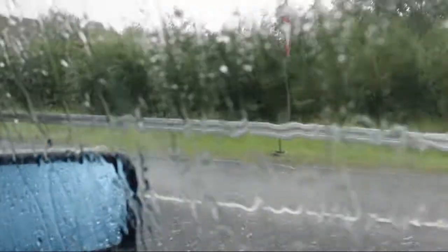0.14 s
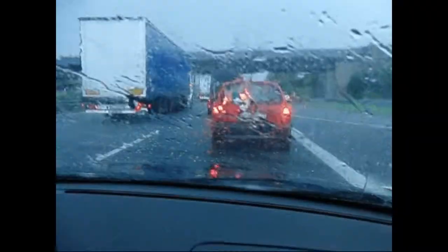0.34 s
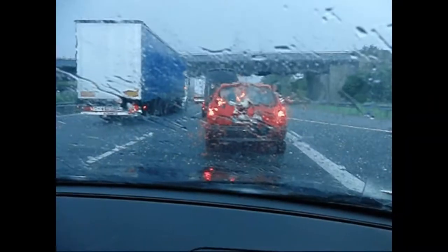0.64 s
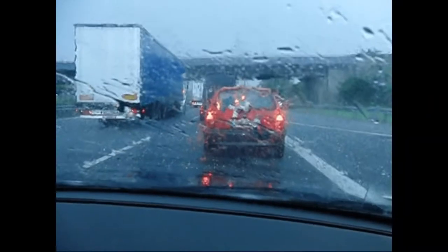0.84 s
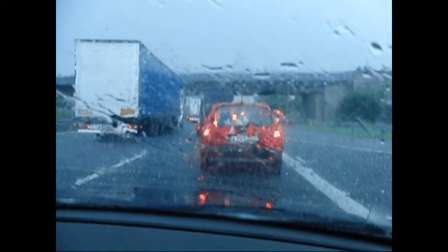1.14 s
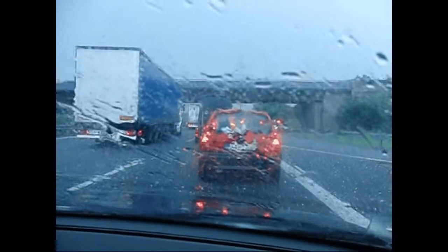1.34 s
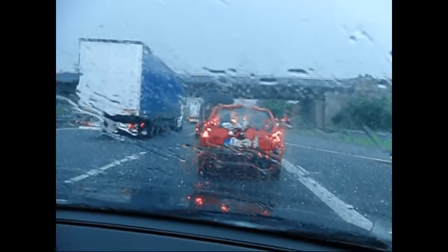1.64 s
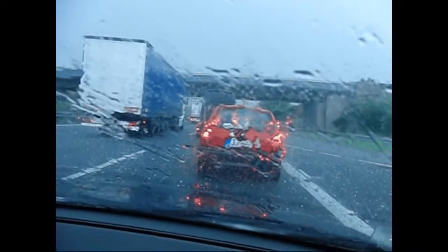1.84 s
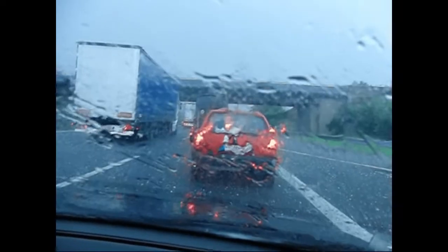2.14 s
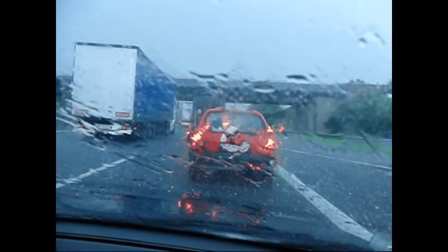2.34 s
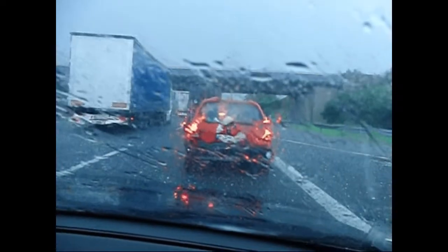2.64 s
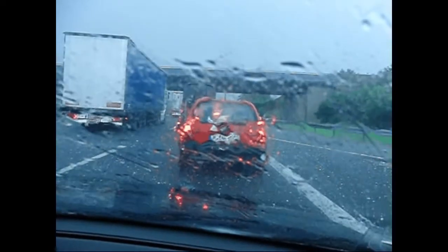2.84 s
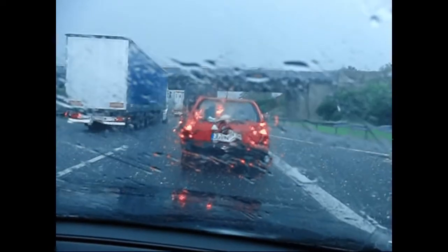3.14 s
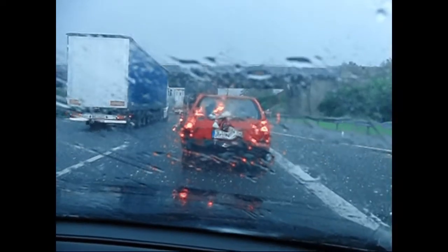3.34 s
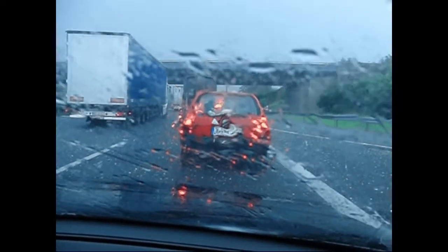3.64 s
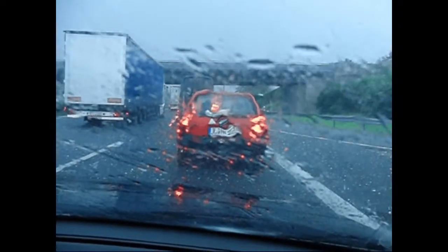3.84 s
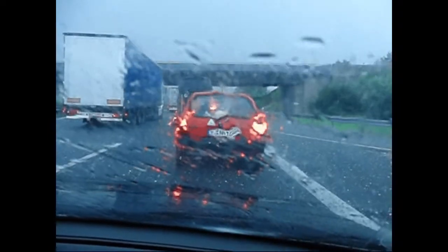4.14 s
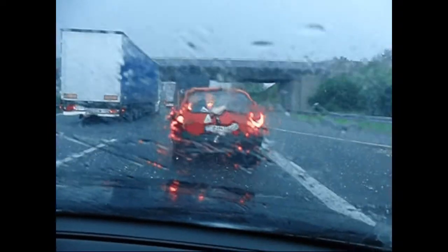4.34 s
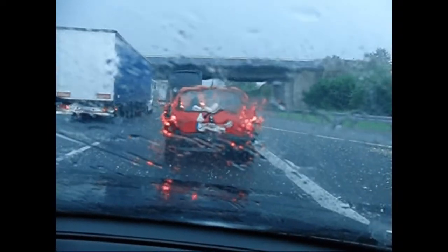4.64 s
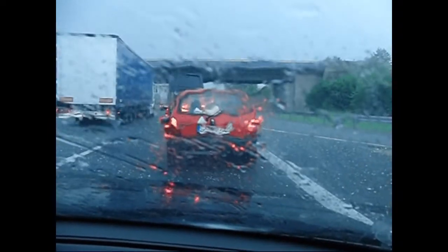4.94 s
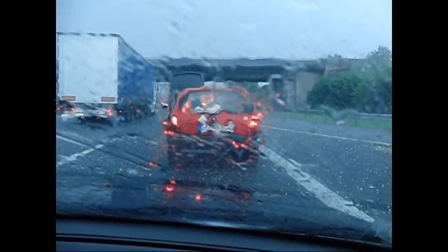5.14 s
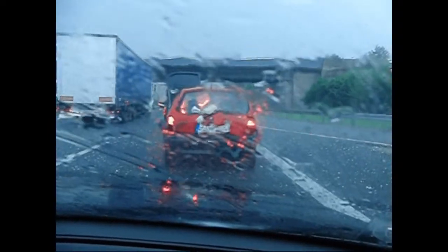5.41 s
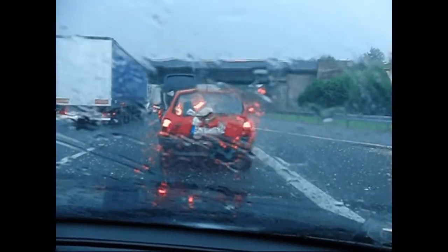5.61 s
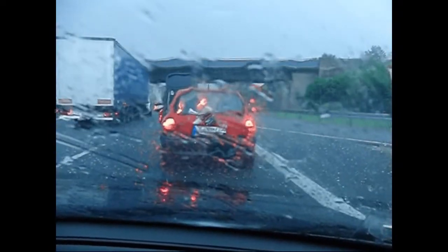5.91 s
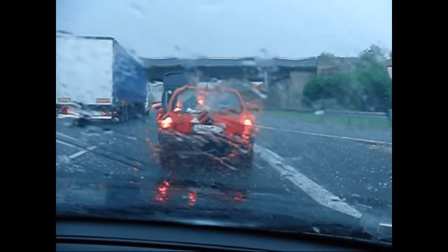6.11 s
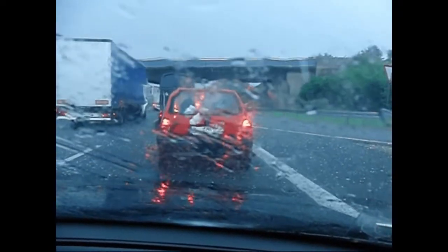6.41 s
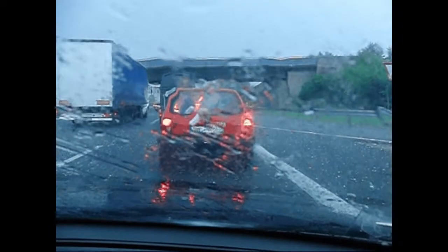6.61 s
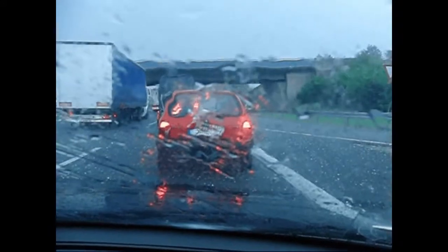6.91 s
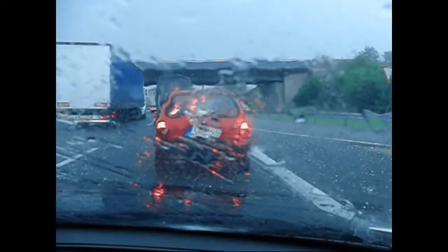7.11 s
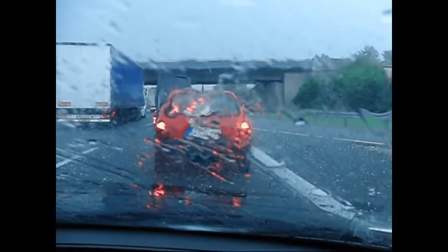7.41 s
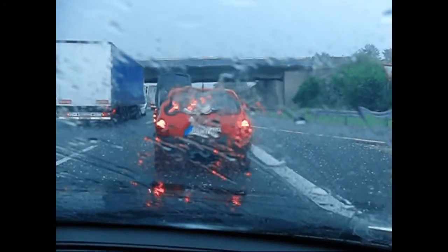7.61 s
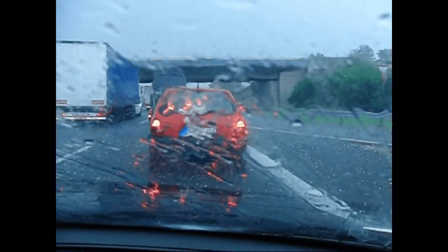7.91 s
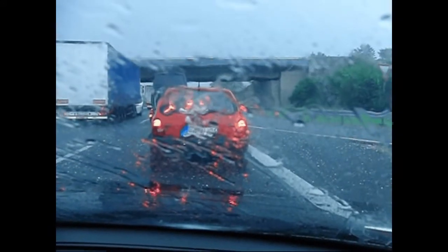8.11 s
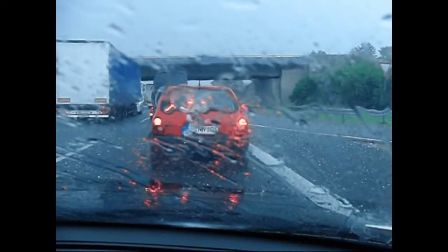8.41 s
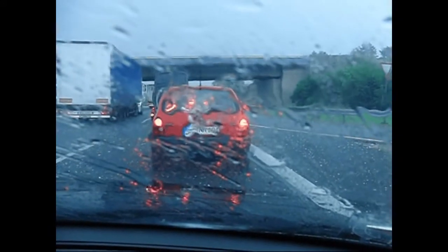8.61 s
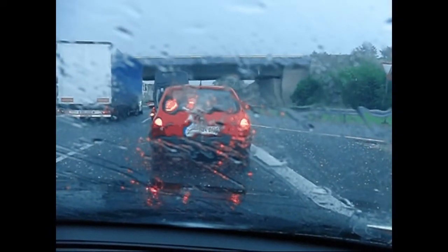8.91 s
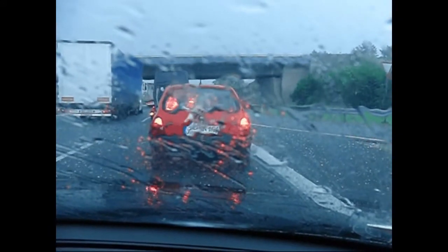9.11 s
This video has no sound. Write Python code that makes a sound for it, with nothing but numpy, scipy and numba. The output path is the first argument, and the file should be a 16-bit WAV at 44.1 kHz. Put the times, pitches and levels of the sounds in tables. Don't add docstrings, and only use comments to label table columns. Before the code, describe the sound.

For a third of a second, bright dense rain hisses at a car's side window. A hard cut leads into the dull cabin, where small hail patters steadily and big stones knock on roof and windscreen at irregular moments, the loudest near 1.65, 3.6, 6.65 and 8.8 seconds. Low tyre and engine rumble lies beneath. A small camera microphone limits the peaks.

```python
import sys
import numpy as np
from scipy import signal
from scipy.fft import rfft, irfft, next_fast_len
from scipy.io import wavfile
from scipy.ndimage import uniform_filter1d, minimum_filter1d
from numba import njit

SR = 44100
rng = np.random.default_rng(int(sys.argv[2]) if len(sys.argv) > 2 else 0)


def transcribe(signal):
    frames = np.atleast_2d(signal).T
    limited = np.clip(frames, -1, 1)
    pcm = np.round(limited * 32767).astype(np.int16)
    wavfile.write(sys.argv[1], SR, pcm)


def field_ratio(decibels):
    return 10 ** (np.asarray(decibels, dtype=float) / 20)


N = 408366

# (time [s], peak level [dB], knock centre [Hz], crack re knock [dB], build-up [ms])
HEAVY_STONES = [(0.368, -9, 990, -16, 16.2), (0.556, -26.5, 780, -5.5, 4), (0.631, -24, 1200, -1.5, 9.4),
                (1.161, -26, 1105, -4.5, 11.7), (1.472, -29.5, 846, -6.5, 12), (1.6525, -4.5, 897, -9.5, 3),
                (1.764, -13, 630, -27, 10.9), (2.189, -26.5, 770, -10, 15.3), (2.845, -19.5, 850, -8, 17.8),
                (2.874, -18, 790, -17, 1.8), (3.051, -13, 1140, -7, 24.7), (3.34, -23, 1150, -2.5, 19.5),
                (3.6045, -2.5, 860, -15, 3.17), (3.793, -23.5, 1180, -5, 12.8),
                (4.015, -17.5, 1066, -4, 13.7), (4.267, -27, 604, -16.5, 11.9), (4.582, -23, 860, -14, 3.2),
                (6.585, -31.5, 880, -9, 19), (6.644, -6, 710, -27, 14.9), (7.089, -26.5, 720, -24, 7.8),
                (8.008, -24.5, 740, -12, 20), (8.266, -21, 914, -6.5, 12.9), (8.423, -14, 1140, -9.5, 26.7),
                (8.799, -0.5, 885, -8.5, 8.15)]
# (time [s], peak level [dB], crack re knock [dB], build-up [ms])
MIDDLING_STONES = [(0.466, -27, -21, 1.3), (1.318, -32.5, -20, 11.5), (1.436, -28, -20, 2.9),
                   (1.54, -28, -24, 3.8), (1.8, -22, -17, 1.9), (1.913, -32, -17.5, 4.8),
                   (1.967, -32, -23, 13.6), (2.215, -30.5, -15, 2.1), (2.334, -38, -25, 3.3),
                   (2.477, -30, -8.5, 4.3), (3.254, -30.5, -13, 3), (4.165, -34.5, -5, 23),
                   (4.196, -31, -5, 8.3), (4.461, -34, -14, 6.9), (4.537, -31, -23, 2.4),
                   (4.567, -36, -1, 4.5), (4.628, -27.5, -14, 16), (4.763, -29, -22, 9),
                   (4.856, -26.5, -13, 2.1), (4.886, -29, -11, 1.54), (5.261, -31, -14, 1.9),
                   (5.284, -27.5, -14.5, 4.7), (5.328, -31, -14, 1.1), (5.727, -34, -21, 16),
                   (6.381, -30, -15, 6.9), (7.138, -26.5, -9.5, 1.35), (7.269, -33.5, -3.5, 17.7),
                   (8.07, -26, -17.5, 1.85), (8.682, -31.5, -25, 2.9), (9.021, -34, -11, 1.24)]


def curve(hz, table):
    points = np.array(table)
    return np.interp(np.log(np.maximum(hz, 1)), np.log(points[:, 0]), points[:, 1])


def unit(x):
    return x / np.sqrt(np.mean(x ** 2))


def colour(x, table):
    n = next_fast_len(len(x), True)
    gain = field_ratio(curve(np.fft.rfftfreq(n, 1 / SR), table))
    return unit(irfft(rfft(x, n) * gain, n)[:len(x)])


def walk(rate):
    k = int(SR / rate)
    steps = np.repeat(rng.standard_normal(N // k + 1), k)
    return 0.67 * uniform_filter1d(uniform_filter1d(steps, k), k)[:N]


@njit
def ring(hz, gain, t60, lag, swell, length):
    out = np.zeros(length)
    for k in range(len(hz)):
        p = np.exp(2j * np.pi * hz[k] / SR - np.log(1000.) / (t60[k] * SR))
        z, rest = gain[k] + 0j, 1.
        for i in range(int(lag[k]), min(length, int(lag[k] + .62 * t60[k] * SR))):
            out[i] += z.imag * (1 - rest) ** 2
            z *= p
            rest *= swell
    return out


def panel(chance, low_hz, high_hz, shape_db, lag_ms, t60, contact_ms):
    count = chance.shape[1]
    hz = low_hz + (high_hz - low_hz) * (np.arange(count) + chance[0]) / count
    gain = field_ratio(shape_db(hz)) * np.sign(chance[1] - .5)
    decay = t60 * (hz / 1000) ** -.25 * (0.47 + 1.27 * chance[2])
    swell = np.exp(-1000 / (contact_ms * SR))
    out = ring(hz, gain, decay, lag_ms * SR / 1000, swell, SR // 3)
    return out / np.abs(out).max()


def add(track, s, blow, peak_db):
    i = int(s * SR)
    blow = blow[:N - i]
    track[i:i + len(blow)] += blow * field_ratio(peak_db) / np.abs(blow).max()


def patter(table, per_s, scatter_db, t60, spray_db, top_hz, count=8):
    out = np.zeros(N)
    for chance in rng.random((count, 4, 400)):
        size_db = scatter_db * np.minimum(rng.exponential(size=N), 3.5)
        strikes = (rng.random(N) < per_s / count / SR) * field_ratio(size_db)
        spot = panel(chance, 98.1, top_hz, lambda hz: 0 * hz, 1.5 * chance[3], t60, 0.2)
        out += signal.oaconvolve(strikes, spot)[:N]
    return colour(unit(out) + field_ratio(spray_db) * rng.standard_normal(N), table)


def window_rain():
    # (frequency [Hz], level [dB per Hz])
    rain_spectrum = [(25, -14), (59, 3.5), (92, -6), (130, 0), (284, -7), (470, -9), (1020, -12.5),
                     (1770, -25.5), (4200, -30), (7200, -39), (7900, -54), (8600, -44), (12000, -47.5),
                     (15600, -55.5)]
    return patter(rain_spectrum, 700, 3.8, .02, 1.2, 16000) * field_ratio(-28)


def bumps_db(t):
    # (time [s], level over the steady rumble [dB])
    bump_events = [(0.39, 12), (1.14, 5.5), (1.56, 11), (1.73, 10.5), (3.11, 7), (3.46, 3), (4.04, 5.5),
                   (4.81, 0.5), (5.61, 4), (6.03, 5), (6.55, 6.5), (6.68, 10), (6.78, 20), (6.9, 14),
                   (2.2, 4.5), (7.3, 4.5), (7.58, 7.5), (7.86, 8.5), (8.16, 7), (9.01, 6)]
    rise_s, fall_s = 0.073, 0.11
    return sum(np.interp(t, [s - rise_s, s, s + fall_s], [0, db, 0]) for s, db in bump_events)


def road_rumble(t):
    # (frequency [Hz], level [dB per Hz])
    road_spectrum = [(18, 2), (34, 15), (55, 11.5), (85, 5), (130, -67.5)]
    return colour(rng.standard_normal(N), road_spectrum) * field_ratio(-34.5 + bumps_db(t))


def engine_drone(patter_db):
    # (frequency [Hz], level [dB per Hz])
    drone_spectrum = [(50, -27.5), (85, 8.5), (112, 9), (160, 5), (230, 6), (400, -20.5), (700, -60)]
    drone_db = -34 + 0.39 * (patter_db + 43)
    return colour(rng.standard_normal(N), drone_spectrum) * field_ratio(drone_db + 1.6 * walk(9.7))


def small_hail(patter_db):
    # (frequency [Hz], level [dB per Hz])
    patter_spectrum = [(180, -22), (290, -3), (400, -6), (550, -10.5), (980, -13.5), (1740, -21),
                       (2300, -25), (3200, -33), (4000, -38.5), (5000, -43), (6300, -58), (7200, -69.5),
                       (8000, -86), (17000, -120)]
    knocks = patter(patter_spectrum, 160, 2.36, 0.1, -0.6, 8000) * field_ratio(1.4 * walk(9.9))
    ticks = patter(patter_spectrum, 45, 1.9, .018, -27.5, 8000)
    return (knocks + field_ratio(-15.5) * ticks) * field_ratio(patter_db + 1.0)


def all_stones():
    # (time [s], peak level [dB])
    light_stones = [(0.796, -34), (0.987, -37), (2.424, -32.5), (2.579, -38), (2.655, -33), (2.731, -33.5),
                    (3.289, -36.5), (3.482, -32), (3.51, -30), (3.539, -37), (4.435, -31), (4.972, -32),
                    (5.039, -40), (5.06, -36), (5.146, -36), (5.21, -42), (5.52, -44), (5.863, -37.5),
                    (5.926, -32), (6.506, -36), (6.915, -27.5), (7.116, -31), (7.38, -31), (7.456, -33),
                    (7.511, -29.5), (7.58, -39), (7.839, -32), (8.185, -31), (8.353, -30.5), (8.651, -42)]
    light_crack_db, light_build_ms = -14, 2.6
    rest = MIDDLING_STONES + [(s, db, light_crack_db, light_build_ms) for s, db in light_stones]
    knock_hz = 820 * (1 + 0.27 * (2 * rng.random(len(rest)) - 1))
    return HEAVY_STONES + [(s, db, hz, crack_db, ms) for (s, db, crack_db, ms), hz in zip(rest, knock_hz)]


def stones():
    track = np.zeros(N)
    table = all_stones()
    for (s, db, centre_hz, crack_db, build_ms), chance in zip(table, rng.random((len(table), 2, 4, 300))):
        def shape_db(hz, dulled_db):
            octaves = np.log2(hz / centre_hz)
            knock = field_ratio(np.where(octaves > 0, -17.0, -8.0) * octaves ** 2)
            low_edge = 1 / (1 + (2100 / hz) ** 6)
            crack = low_edge * field_ratio(crack_db - dulled_db - 8.34 * (hz - 2800) / 1000)
            return 20 * np.log10(knock + crack)

        pieces = np.round(chance[0, 3] ** .6 * 4) / 4
        blow_lag_ms = build_ms * pieces + 1.2 * chance[1, 0]
        blows = panel(chance[0], 195.0, 7987, lambda hz: shape_db(hz, 7.2), blow_lag_ms, 0.034, 0.11)
        tail_lag_ms = (build_ms + 6.0) * chance[1, 3] ** .7
        tail = panel(chance[1], 200.7, 8000, lambda hz: shape_db(hz, 3.8), tail_lag_ms, 0.18, 0.8)
        tail_db = -10 - 0.22 * db
        add(track, s - .0005, blows + field_ratio(tail_db + 1.5) * tail, db - 0.5)
    return track


def rings():
    # (time [s], peak level [dB], centre [Hz])
    singing_patches = [(0.372, -8, 1330), (0.39, -23, 2850), (1.6526, -8, 1500), (1.6546, -13, 3500),
                       (3.0606, -10, 1370), (3.6045, -6, 560), (4.029, -23, 1540), (6.6532, -15, 1300),
                       (8.4419, -19, 1690), (8.7997, -3, 1660), (8.8009, -8, 2000), (2.2165, -30, 2400),
                       (0.368, -9, 1187), (0.392, -12, 1220), (0.631, -20, 1300), (6.645, -18, 900),
                       (6.668, -11, 700), (6.672, -24, 1400), (1.171, -26, 2500), (4.031, -22.5, 3260),
                       (3.8, -29, 3400), (6.595, -34, 3300), (8.803, -10, 2000), (1.32, -25, 840),
                       (2.5, -35, 720), (4.465, -31, 910), (4.583, -32, 1090), (8.682, -34, 1500),
                       (8.445, -24, 3000)]
    low = [(s + .45 * ms / 1000, db + crack_db / 2 - 5, 1.3 * hz)
           for s, db, hz, crack_db, ms in HEAVY_STONES]
    high_hz = 2406 * (1 + 0.27 * (rng.random(len(HEAVY_STONES)) - .5))
    high = [(s + .75 * ms / 1000, db + crack_db - 5.5, hz)
            for (s, db, _, crack_db, ms), hz in zip(HEAVY_STONES, high_hz)]
    track, table = np.zeros(N), low + high + singing_patches
    for (s, db, centre_hz), chance in zip(table, rng.random((len(table), 4, 10))):
        patch = panel(chance, .88 * centre_hz, 1.12 * centre_hz, lambda hz: 0 * hz, 9.0 * chance[3], 0.054, 0.75)
        add(track, s, patch, db - 9.0)
    return track


def pellets():
    # (time [s], peak level [dB])
    lone_pellets = [(0.3742, -34), (1.365, -50), (1.8434, -42), (1.915, -48), (1.98, -44), (2.036, -47),
                    (2.191, -37), (2.2173, -41), (2.4799, -41), (2.5787, -48), (3.5789, -43), (4.416, -46),
                    (4.584, -32.5), (5.4307, -37), (5.7111, -40), (5.93, -46), (6.0049, -49), (6.5951, -44),
                    (7.9151, -43), (8.0174, -41), (8.57, -50), (8.6838, -39), (8.71, -48), (8.8004, -12),
                    (6.648, -36), (6.674, -35), (7.1169, -38), (4.05, -40), (3.625, -33)]
    shattering = [(s, db, crack_db, ms) for s, db, _, crack_db, ms in HEAVY_STONES] + MIDDLING_STONES
    shards = [(s + .75 * ms / 1000, db + crack_db - 7.5) for s, db, crack_db, ms in shattering]
    track, table = np.zeros(N), shards + lone_pellets
    for (s, db), chance in zip(table, rng.random((len(table), 4, 60))):
        click = panel(chance, 1200, 7600, lambda hz: -5.0 * hz / 1000, .4 * chance[3], 0.0042, .1)
        add(track, s, click, db + 1.0)
    return track


def dry_taps():
    # (time [s], peak level [dB], centre [Hz])
    glass_knocks = [(0.375, -14, 940), (0.394, -8, 950), (0.556, -29, 764), (0.634, -27, 1340),
                    (0.796, -35, 945), (0.895, -35, 538), (0.987, -32, 770), (1.104, -31, 565),
                    (1.171, -27, 1240), (1.181, -32, 505), (1.246, -28, 584), (1.323, -24.5, 973),
                    (1.363, -31, 740), (1.436, -30, 770), (1.653, -11, 1066), (1.766, -25, 945),
                    (1.971, -32, 773), (2.335, -27, 721), (2.376, -29, 557), (2.48, -27, 996),
                    (2.578, -28.5, 767), (2.807, -36, 511), (2.853, -24, 778), (3.07, -17.5, 1530),
                    (3.256, -29, 751), (3.352, -25, 1280), (3.538, -32, 654), (3.605, -6, 877),
                    (4.024, -23, 830), (4.173, -33, 796), (4.466, -23, 877), (4.538, -29, 756),
                    (4.583, -13, 861), (4.857, -20, 950), (4.869, -24, 969), (5.038, -29, 805),
                    (5.059, -27, 883), (5.245, -26, 818), (5.328, -25.5, 1130), (5.578, -41, 770),
                    (5.815, -30, 552), (5.927, -29, 980), (5.987, -35, 727), (6.059, -34, 727),
                    (6.382, -24, 635), (6.507, -30, 1120), (6.593, -19, 1150), (6.646, -5.5, 620),
                    (6.674, -17, 740), (7.091, -28, 735), (7.456, -32, 670), (7.581, -28, 736),
                    (7.706, -38, 517), (7.783, -36, 514), (8.277, -22, 813), (8.426, -19, 1040),
                    (8.445, -13, 1700), (8.683, -25, 630), (8.8, -2, 1014)]
    # (time [s], peak level [dB], centre [Hz])
    ice_splinters = [(0.385, -19, 2830), (1.178, -35, 2580), (1.365, -44.5, 3400), (1.655, -29, 6160),
                     (1.6545, -15, 3330), (3.607, -17, 2980), (3.613, -26, 3190), (3.626, -39, 5500),
                     (3.635, -40, 5000), (1.68, -37, 5000), (4.425, -42, 3000), (1.333, -42, 2800),
                     (1.98, -43, 2800), (5.72, -42, 2500), (3.605, -32, 5930), (4.572, -46, 3680),
                     (6.596, -37, 3300), (6.655, -34.5, 5960), (6.661, -25, 3260), (6.673, -38, 4500),
                     (6.686, -39, 4000), (6.701, -42, 3500), (8.285, -32, 2600), (8.801, -31, 5400)]
    track, table = np.zeros(N), glass_knocks + ice_splinters
    for (s, db, centre_hz), chance in zip(table, rng.random((len(table), 4, 60))):
        def shape_db(hz):
            return -15 * np.log2(hz / centre_hz) ** 2

        low_hz, high_hz = 0.443 * centre_hz, min(2.4 * centre_hz, 7900)
        knock = panel(chance, low_hz, high_hz, shape_db, 2.5 * chance[3], .03, 0.19)
        add(track, s - .0008, knock, db - 6.5)
    return track


def booms():
    # (time [s], peak level [dB], centre [Hz], ring t60 [s])
    roof_booms = [(0.382, -13, 155, 0.15), (0.554, -15.5, 134, 0.058), (1.11, -19.5, 119, 0.23),
                  (1.47, -22, 202, 0.064), (1.529, -13, 79, 0.13), (1.648, -7, 340, 0.045),
                  (1.771, -15, 121, 0.12), (2.25, -24.5, 164, 0.37), (2.578, -32, 209, 0.12),
                  (2.858, -12.5, 171, 0.21), (3.068, -20.5, 99.6, 0.18), (3.353, -31, 168, 0.074),
                  (3.599, -12.5, 334, 0.069), (4.173, -16.5, 87.6, 0.066), (4.271, -16, 105, 0.1),
                  (4.374, -37, 181, 0.28), (5.132, -26.5, 145, 0.16), (5.273, -16.5, 150, 0.12),
                  (6.191, -26, 109, 0.26), (6.461, -23, 101, 0.095), (6.643, -4, 118, 0.16),
                  (6.848, -13.5, 93, 0.058), (7.11, -19.5, 80, 0.14), (7.64, -29.5, 173, 0.49),
                  (8.005, -16, 173, 0.32), (8.354, -21.5, 182, 0.26), (8.798, -18, 91.5, 0.11)]
    track = np.zeros(N)
    for (s, db, centre_hz, t60), chance in zip(roof_booms, rng.random((len(roof_booms), 4, 24))):
        def shape_db(hz):
            return -5.0 * np.log2(hz / centre_hz) ** 2

        blow = panel(chance, 34.75, 479.3, shape_db, 6.7 * chance[3], 0.9 * max(t60, .02), 1.2)
        add(track, s, blow, db - 0.5)
    return track


def ducks_db(t):
    # (time [s], depth [dB], hold [s])
    gain_dips = [
        (0.42, 0, 0.44),
        (1.83, -2, 0.23),
        (3.632, -6, 0.22),
        (6.699, -7, 0.17),
        (8.833, -1, .3),
    ]
    fall_s, back_s = 0.078, 0.16
    return sum(np.interp(t - s, np.cumsum([0, fall_s, hold_s, back_s]), [0, db, db, 0])
               for s, db, hold_s in gain_dips)


@njit
def limiter(peak, top, release):
    y, e = np.empty(len(peak)), top
    for i in range(len(peak)):
        e = max(peak[i], top + (e - top) * release)
        y[i] = top / e
    return y


def microphone(x):
    x = signal.lfilter(*signal.iirnotch(1985, 14.0, SR), x)
    treble_band = signal.butter(4, 4700, "high", fs=SR, output="sos")
    treble = signal.sosfiltfilt(treble_band, x)
    x = x + treble * (unit(field_ratio(6.5 * walk(200))) - 1)
    steep_top = signal.butter(14, 7700, fs=SR, output="sos")
    x = signal.sosfilt(steep_top, x)
    ahead = -minimum_filter1d(-np.abs(x), size=89)
    gain = limiter(ahead, 0.72, 1 - 1 / (0.015 * SR))
    x = signal.sosfilt(steep_top, x * uniform_filter1d(gain, size=89))
    return x + field_ratio(-99.0) * rng.standard_normal(N)


def scene():
    # (time [s], patter level [dB])
    shower = [(0.29, -46.5), (0.39, -39.5), (0.84, -41.5), (1.24, -43), (1.8, -39), (2.2, -45.5),
              (2.4, -41.5), (2.7, -44.5), (2.9, -42.5), (3.55, -38.5), (4.5, -42.5), (4.96, -38),
              (5.7, -42), (6.55, -40.5), (7.26, -40), (7.6, -43.5), (8.4, -38.5), (9.26, -42)]
    change_s = .2885
    t = np.arange(N) / SR
    patter_db = np.interp(t, *np.transpose(shower))
    rain = window_rain()
    cabin = road_rumble(t) + engine_drone(patter_db) + small_hail(patter_db)
    cabin += stones() + rings() + pellets() + dry_taps() + booms()
    heard = microphone(cabin * field_ratio(ducks_db(t)))
    return np.where(t < change_s, rain, heard)[None]


def roll_off(x):
    return signal.sosfilt(signal.butter(12, 15710, fs=SR, output="sos"), x)


def record(dry):
    return roll_off(dry)


dry = scene()
out = record(dry)
transcribe(out)
```